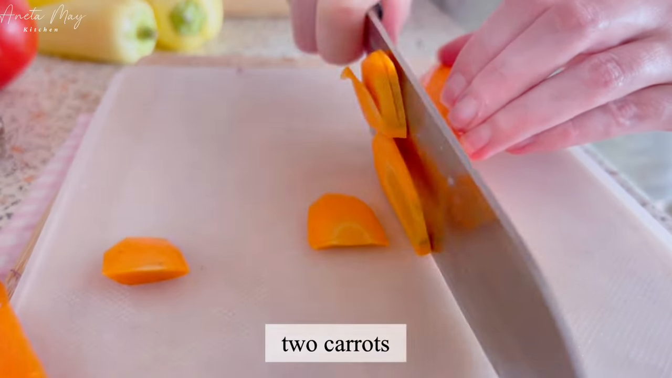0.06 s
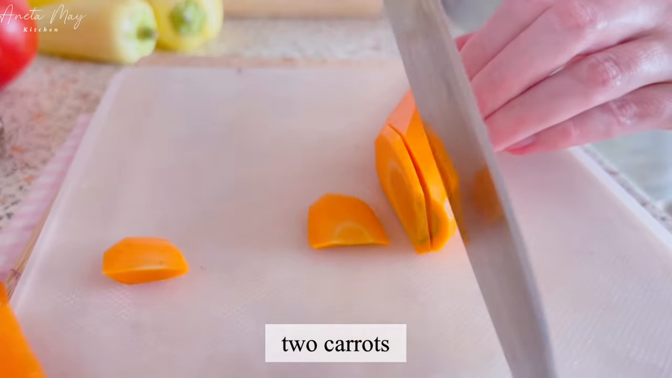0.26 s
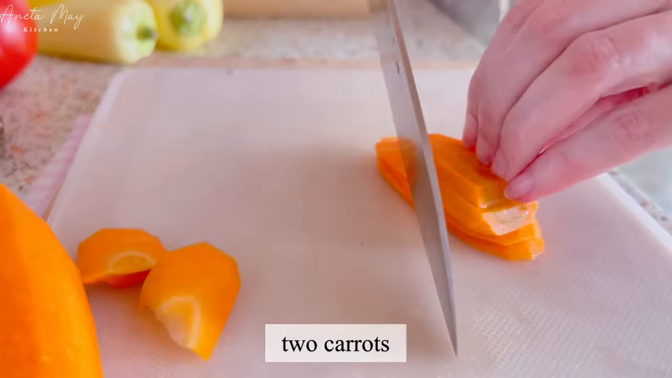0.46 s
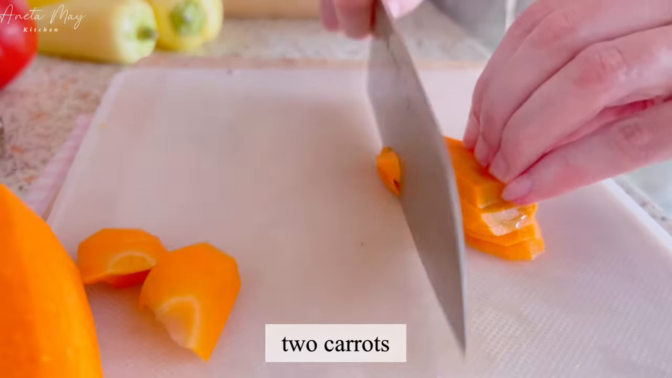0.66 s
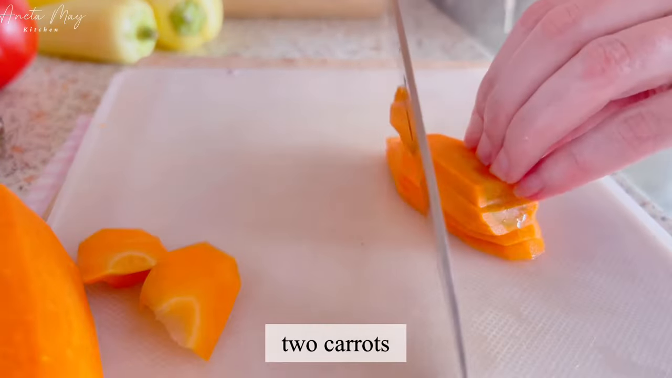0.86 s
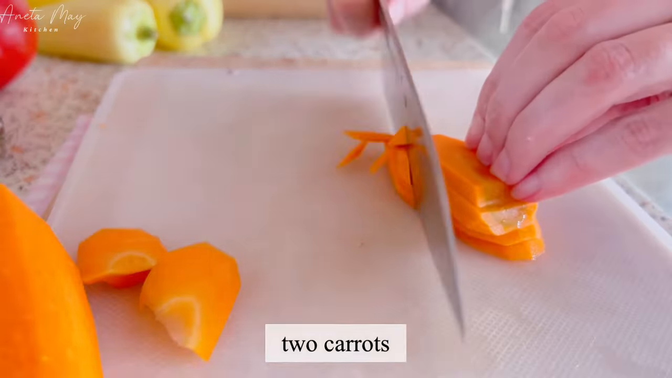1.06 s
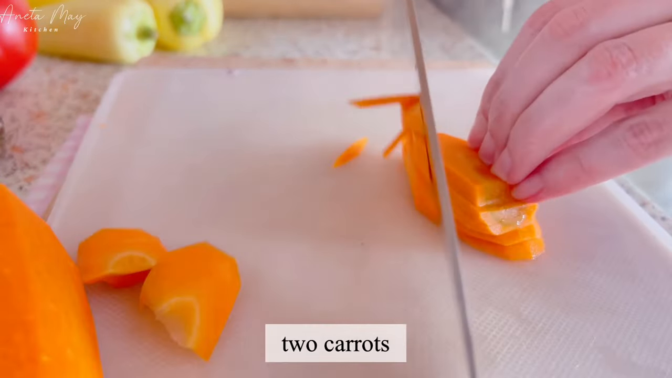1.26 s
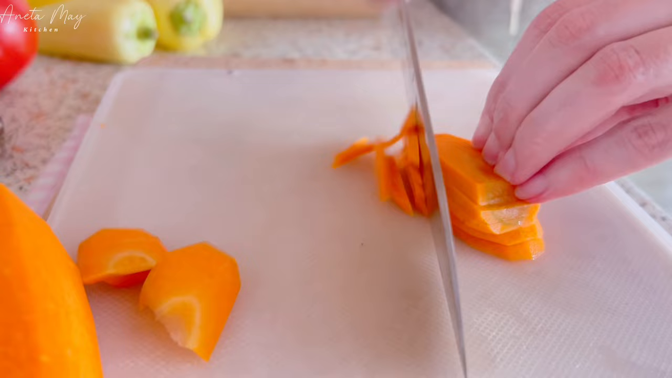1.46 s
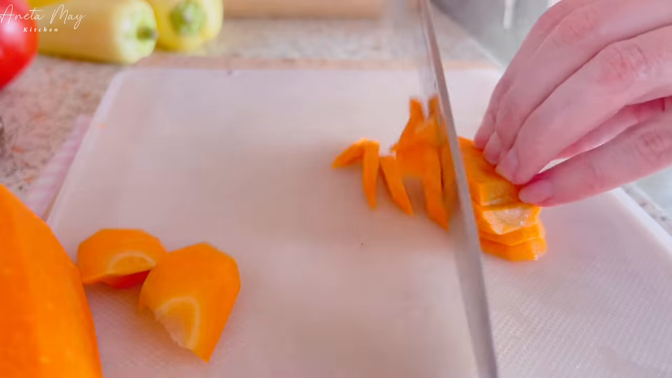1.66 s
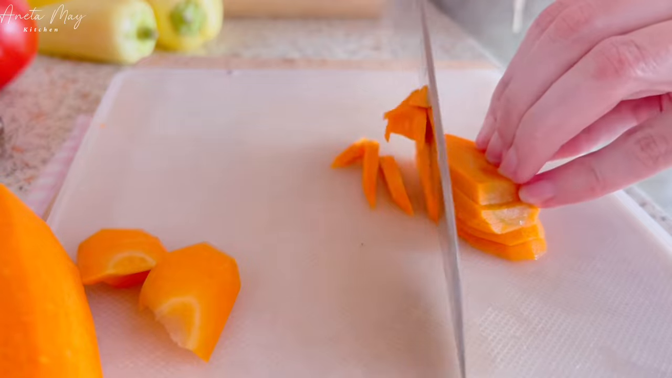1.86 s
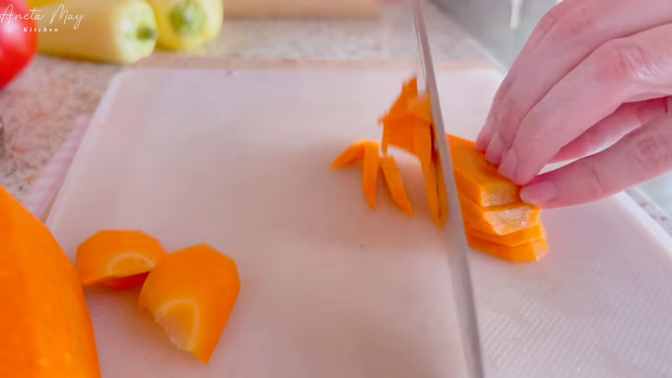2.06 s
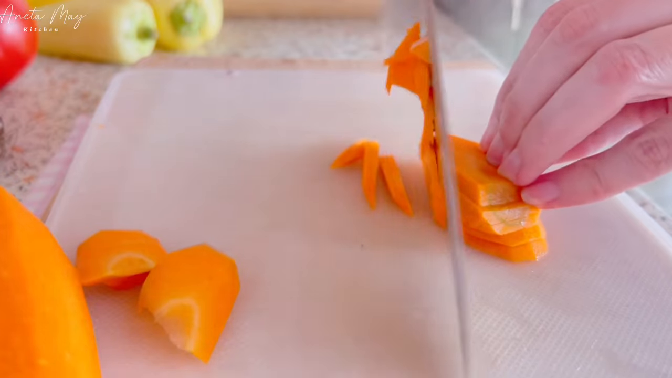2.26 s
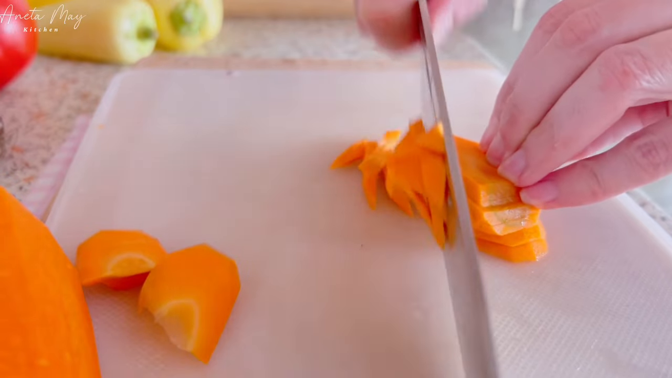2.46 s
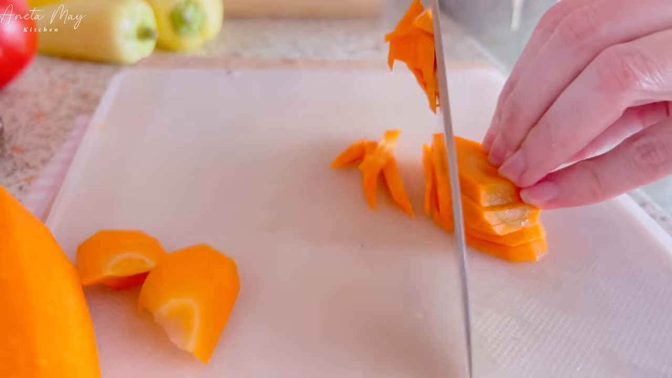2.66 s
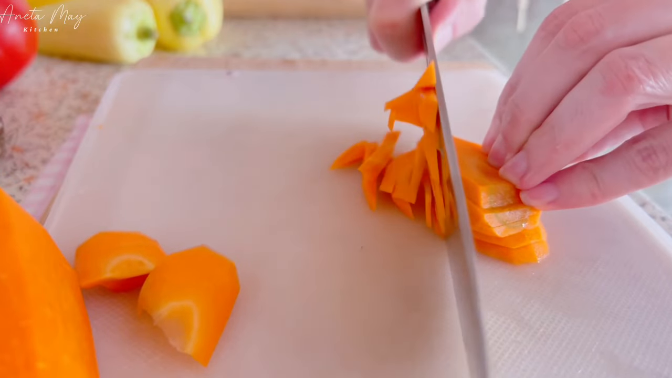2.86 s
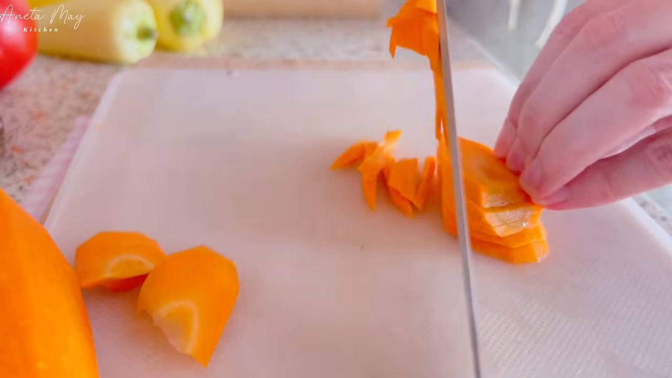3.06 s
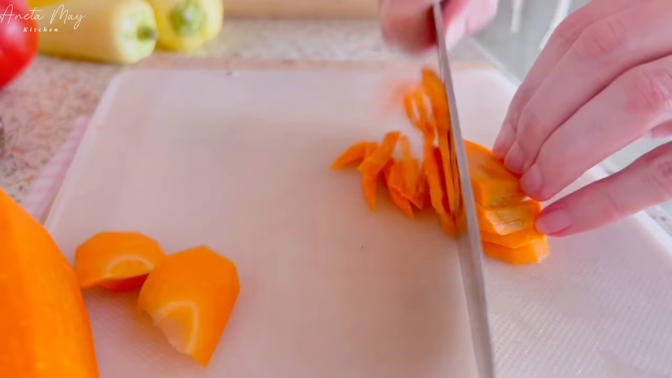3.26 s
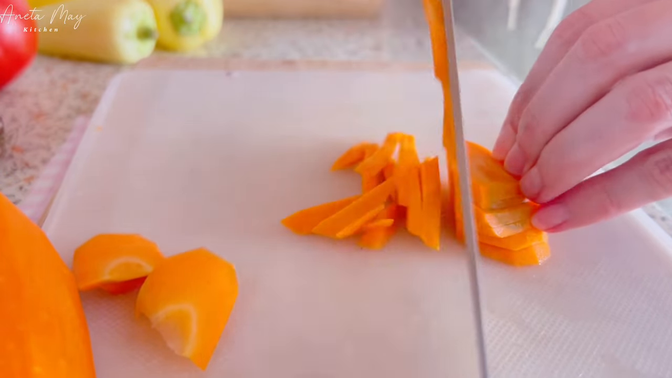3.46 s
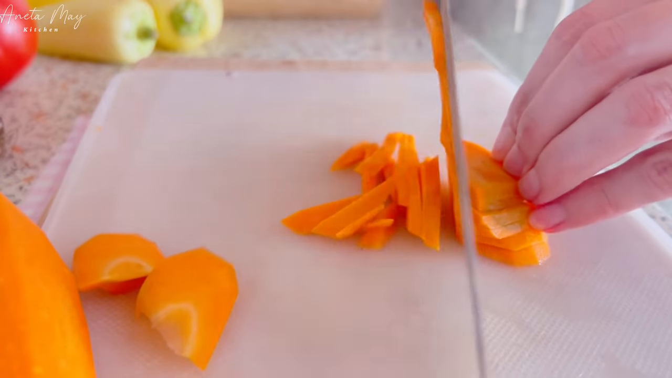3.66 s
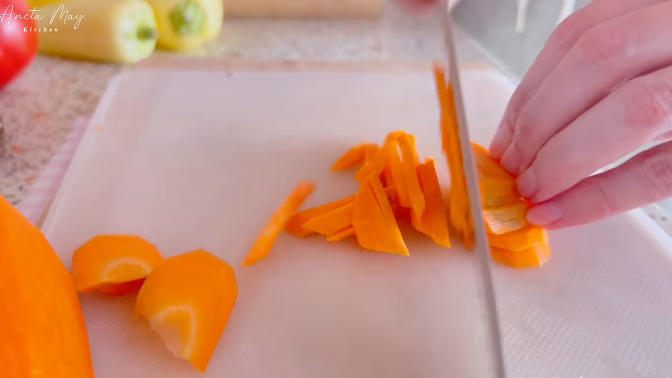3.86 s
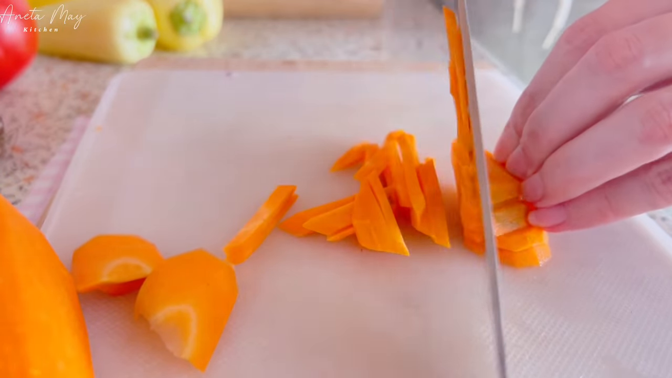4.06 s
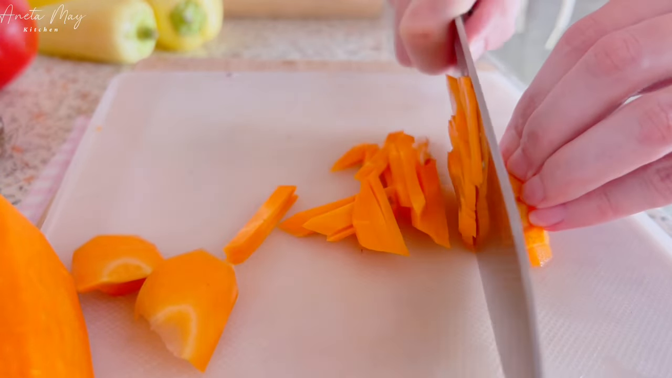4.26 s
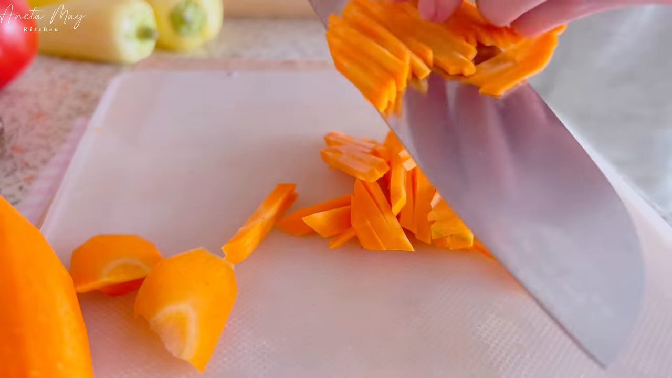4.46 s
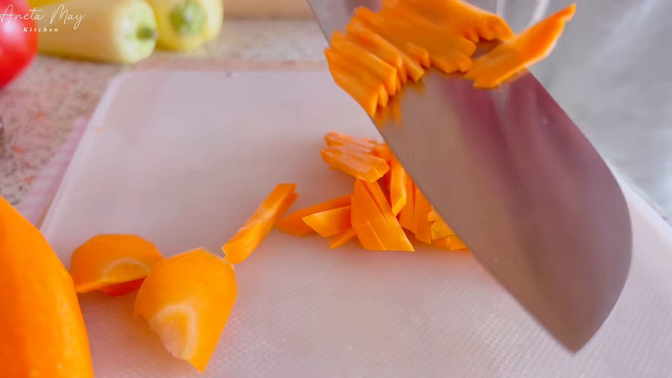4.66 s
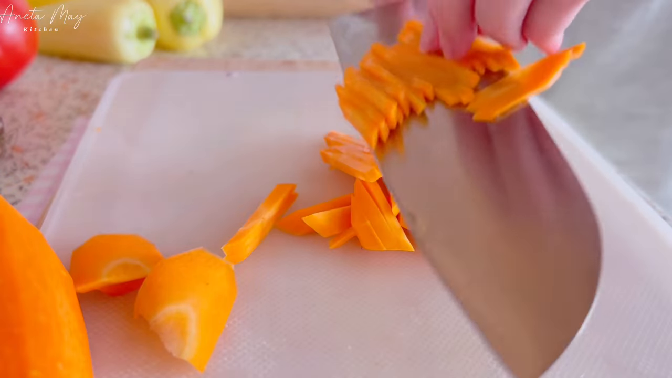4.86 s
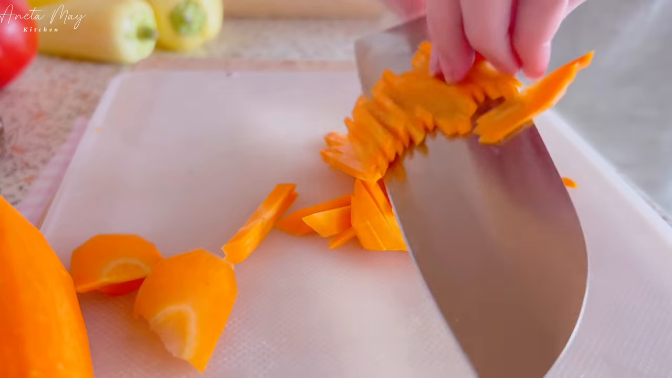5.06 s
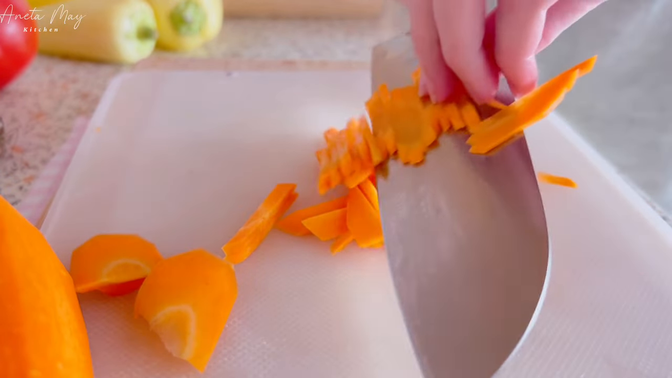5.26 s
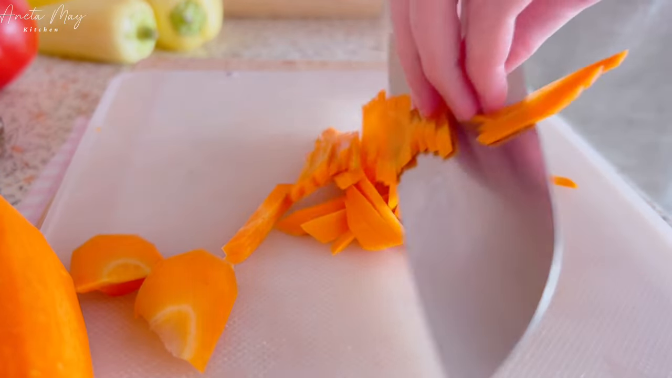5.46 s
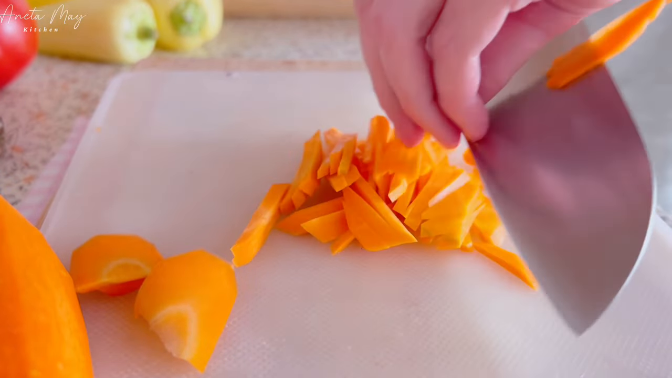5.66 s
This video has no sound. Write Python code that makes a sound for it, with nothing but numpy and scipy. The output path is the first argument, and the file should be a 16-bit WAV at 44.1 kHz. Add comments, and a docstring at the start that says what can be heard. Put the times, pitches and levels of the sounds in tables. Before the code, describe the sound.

A heavy knife slices stacked carrot on a plastic cutting board: nine crisp, juicy crunches at an even pace, with light blade scrapes between them. Early cuts are mostly tearing; later ones end in firm, low thunks that shake the counter. Small pieces tick down, then hissing finger wipes ring the blade. Close microphones, short room echo, faint low rumble and room tone.

```python
"""Quiet kitchen, a large knife on carrots over a plastic board, close to a pair of microphone ports.
A cut is under way at the start, then soft knocks and a brief wipe of the blade; more cuts follow, the fibres
tearing in a dense crackle that rings blade and board under wet hiss, with harder knocks from midway on.
Cut pieces tick now and then after the third cut, thickest after the last; then fingers wipe the blade and it
sings. Shaped noise makes room tone and counter rumble all along; decaying low sines make the booms."""
import sys
import numpy as np
from scipy import signal
from scipy.fft import rfft, irfft
from scipy.io import wavfile
from scipy.ndimage import uniform_filter1d

SR = 44100
rng = np.random.default_rng(int(sys.argv[2]) if len(sys.argv) > 2 else 0)


def unload_wav(signal):
    """Save mono or channel-first audio to the path in sys.argv[1] as 16-bit WAV at rate SR, clipped to [-1, 1]."""
    wavfile.write(
        sys.argv[1],
        SR,
        np.round(np.clip(np.atleast_2d(signal).T, -1, 1) * 32767).astype(np.int16),
    )


N = 251811


def from_db(db):
    """Amplitude gain for a level in dB."""
    return 10 ** (np.asarray(db) / 20)


def rms_one(x):
    """Scales to an rms of 1."""
    return x / np.sqrt(np.mean(x ** 2) + 1e-20)


def peak_one(x):
    """Scales both parts so that the shared part peaks at 1."""
    return x / np.abs(x[0]).max()


def in_time(rows):
    """Columns of dB joined in time, as gains; silent outside the rows."""
    s, *columns = np.transpose(rows)
    t = np.arange(N) / SR
    return [from_db(np.interp(t, s, column, left=-200, right=-200)) for column in columns]


def at_hz(points, hz):
    """Reads a curve between its points along log frequency, holding its end values."""
    curve = np.array(points)
    return np.interp(np.log(hz), np.log(curve[:, 0]), curve[:, 1])


def drift(per_s):
    """Slow chance: straight lines between random knots of spread 1."""
    knots = rng.standard_normal(int(60 * N / SR))
    return np.interp(np.arange(N) / SR * per_s, np.arange(len(knots)), knots)


def resonate(x, hz, width_hz):
    """One resonance, gain about 1 on top."""
    r = np.exp(-np.pi * width_hz / SR)
    poles = [1, -2 * r * np.cos(2 * np.pi * hz / SR), r * r]
    return signal.lfilter([(1 - r * r) / 2, 0, (r * r - 1) / 2], poles, x + 1e-18)


def body(x, modes, wander_db=None, per_s=10.):
    """Resonances side by side, each drive wandering as the contact moves; about keeps white noise's rms."""
    power = sum(from_db(2 * db) * np.pi * width / SR for hz, width, db in modes)
    out = 0
    for k, (hz, width, db) in enumerate(modes):
        wander = wander_db * drift(per_s) if wander_db else 0
        drive = x * from_db(db + wander)
        out = out + (-1) ** k * resonate(drive, hz, width)
    return out / np.sqrt(power)


def colour(x, spectrum):
    """Shapes a spectrum, falling away below its first point; white noise keeps its rms."""
    hz = np.fft.rfftfreq(N, 1 / SR) + 1
    gain = from_db(at_hz([(spectrum[0][0] / 2, -80)] + list(spectrum), hz))
    return irfft(rfft(x) * rms_one(gain), N)


def crackle(per_s, spread_db):
    """Random breaks of uneven force, drawn separately for the shared and the differing part of the ports."""
    uneven_db = spread_db * np.minimum(rng.exponential(1, (2, N)), 4)
    sizes = from_db(uneven_db) * rng.standard_normal((2, N))
    return rms_one(sizes * (rng.random(N) < per_s / SR))


def burst(ms, rise):
    """A short noisy contact that swells and dies; its envelope peaks at 1."""
    t = np.arange(int(7 * ms * SR / 1000) + 8) / (ms * SR / 1000)
    shape = t ** (2 * rise) * np.exp(-t * (1 + rise))
    return shape / shape.max() * rng.standard_normal((2, len(t)))


def add(track, s, sound):
    """Lays a sound into the track at s seconds."""
    at = round(s * SR)
    track[:, at:at + sound.shape[1]] += sound[:, :N - at]


def gesture(start, times, shape_db, level_db, fall_db_per_s):
    """Gain that climbs out of silence through the given points, then falls at a steady rate."""
    t = np.arange(N) / SR - start
    times = np.cumsum(np.maximum(times, .002))
    db = np.interp(t, [0, *times], [-35, *shape_db], left=-200)
    fall_db = fall_db_per_s * np.maximum(t - times[-1], 0)
    return from_db(np.maximum(level_db + db - fall_db, -200))


def tail(x, t60):
    """The echo alone: a dull decaying noise of equal energy, after a 4 ms delay."""
    t = np.arange(int(.4 * SR)) / SR
    echo = rng.standard_normal((2, len(t))) * from_db(-60 * t / t60) * (t > .004)
    echo = signal.lfilter([1], [1, -.6], echo)     # dulls the treble
    return signal.fftconvolve(x, echo / np.sqrt(np.sum(echo[0] ** 2)), axes=1)[:, :N]


# spectrum of the quiet kitchen: f/Hz, density level/dB
ROOM_TONE = [(59, -29.5), (100, -4), (648, -16), (1130, -16), (1760, -23.5), (6840, -36.5), (9410, -37),
             (11400, -39.5), (13500, -53), (15000, -38), (16000, -42)]
ROOM_TONE_DB = -73


def room_tone():
    """Steady noise of the kitchen, shaped by its spectrum."""
    return from_db(ROOM_TONE_DB) * colour(rng.standard_normal((2, N)), ROOM_TONE)


# the counter shakes under hands and knife: t/s, counter level/dB, level of a random low board noise/dB
RUMBLE = [(0.0, -55.5, -66), (0.32, -62.5, -86), (0.62, -60.5, -63), (0.98, -58.5, -65), (2.1, -59, -62),
          (2.37, -56, -61), (2.7, -60, -68), (2.89, -54.5, -91), (3.1, -56.5, -55), (3.24, -61.5, -62),
          (3.44, -55.5, -71.5), (3.88, -62, -68.5), (4.25, -59, -63.5), (4.82, -64, -71),
          (5.58, -58, -75.5), (5.71, -61, -57.5)]
# spectrum of the shaking: f/Hz, density level/dB
SHAKE = [(12, -43.5), (20, -1.5), (75, 6.5), (130, -3), (156, -2.5), (200, -14), (260, -38), (440, -120)]
# the counter takes a soft blow and booms: t/s, level before the soft onset/dB, f/Hz, t60/s
THUMPS = [(0.617, -37.5, 70.5, 0.15), (1.079, -31, 77.3, 0.18), (1.507, -37, 83, 0.098),
          (1.845, -61, 69, 0.14), (2.28, -53, 93.5, 0.17), (2.748, -37, 73.4, 0.099),
          (3.219, -34.5, 94.6, 0.12), (3.693, -36.5, 104, 0.21), (4.198, -32, 102, 0.12)]
COUNTER_JOLT_DB, COUNTER_LAG_S, COUNTER_SMEAR_S = -9.5, 0.02, .06     # the push also shakes the counter


def counter():
    """Lumpy low shaking, late and smeared after the knife's push, and a damped boom after each soft blow."""
    lumps = from_db(2 * drift(9))
    smeared = uniform_filter1d(force(2), int(COUNTER_SMEAR_S * SR))
    jolt = smeared[np.maximum(np.arange(N) - int(COUNTER_LAG_S * SR), 0)]
    level = in_time(RUMBLE)[0] + from_db(COUNTER_JOLT_DB) * jolt
    # the out-of-order last point makes a flat floor above 400 Hz
    shaking = colour(rng.standard_normal((2, N)), list(SHAKE) + [(400, -63.5)])
    out = level * lumps * shaking
    t = np.arange(int(.3 * SR)) / SR
    for s, level_db, hz, t60 in THUMPS:
        decay = from_db(level_db - 60 * t / t60)
        onset = 1 - np.exp(-t / 0.0065)
        boom = decay * onset * np.sin(2 * np.pi * hz * t)
        add(out, s, boom * [[1], [.3]])     # mostly shared by the ports
    return out


# fingers and slices wiping the blade: t/s, rise/s, rub level/dB, fading/(dB/s), singing over rub level/dB
WIPES = [(0.165, .008, -66.5, 300, -15), (0.24, .018, -66.5, 1493, -7.5), (4.965, 0.022, -80.5, 100, -1.5),
         (5.02, 0.0373, -66, 400, -1.5), (5.1, 0.021, -66, 148, -4.5), (5.22, 0.025, -76.5, 256.5, -1),
         (5.438, .02, -68.5, 340, -11), (5.591, .045, -58.5, 401, 3)]
# spectrum of the rub: f/Hz, density level/dB
RUB = [(1500, 0), (3000, -5.5), (4800, -7), (7000, -2.5), (9500, -5.5), (12000, -14), (15200, -3)]
# free blade singing under the fingers: f/Hz, width/Hz, level/dB
SINGING = [(2895, 50, -4.5), (3540, 72, -9), (4700, 105, -8), (5680, 70, 4), (5950, 70, -2),
           (6800, 160, -8.5), (8160, 90, -10), (8660, 56, -11), (10000, 60, -10), (11800, 49, -24),
           (12400, 70, -8), (14900, 250, -3)]


def fingers():
    """Wet skin and slices rub the steel: hiss, with the blade's narrow modes singing through."""
    rub = sum(gesture(s, [rise], [0], db, fading) for s, rise, db, fading, _ in WIPES)
    singing = sum(gesture(s, [rise], [0], db + over_db, fading) for s, rise, db, fading, over_db in WIPES)
    skin = from_db(3.5 * drift(40)) * crackle(3600, spread_db=-2)
    blade = body(singing * skin, SINGING, wander_db=4.0, per_s=18)
    return blade + from_db(-1.0) * colour(rub * skin, RUB)


# cut pieces snap off or land: t/s, peak level/dB, centre f/Hz, top level before a trim/dB,
# length scale/ms, swell (0 sudden to 3 slow)
TICKS = [(1.214, -57.5, 3280, -52.5, 5.5, 0.65), (1.659, -55, 3050, -44, 4.9, 0.45),
         (2.688, -41.5, 1820, -45.5, 1.9, 0.37), (2.95, -63, 3000, -56.5, 4.1, 0.95),
         (2.971, -47.5, 1835, -63, 3.4, .3), (3.133, -43.5, 2080, -72, 0.83, 0.62),
         (3.307, -25.5, 3596, -50.5, 5, 2.9), (3.397, -66, 2130, -52.5, 4.3, 0.78),
         (3.804, -50.5, 2950, -58.5, 10, 0.54), (3.865, -36.5, 2210, -61.5, 4.3, 0.81),
         (3.896, -62, 2530, -62, 3.6, 0.83), (4.489, -44, 2560, -45.5, 2.6, 0.32),
         (4.542, -24.5, 2510, -82, 2, 0.071), (4.583, -42, 2190, -86.5, 0.9, 0.38),
         (4.635, -43.5, 1630, -45.5, 2.2, 0.28), (4.685, -39, 2150, -63, 1.2, 0.32),
         (4.709, -49.5, 1530, -85, 2.8, 0.63), (4.743, -37.5, 2030, -56, 2.2, 0.51),
         (4.812, -56.5, 1636, -91.5, 2.23, 0.5), (5.358, -80, 4530, -48.5, 0.95, 0.19),
         (5.55, -54, 1560, -90, 4.2, 1.2)]
# wet top, also heard in the cuts: f/Hz, density level/dB
HISS = [(4000, -17.5), (5000, -7.5), (6200, -3), (7900, 0), (9500, -0.5), (12000, -3), (15500, 1.5)]


def pieces():
    """Each piece is a tiny burst through broad resonances set by its size; it taps the board and rattles out."""
    out, top = np.zeros((2, N)), np.zeros((2, N))
    for s, peak_db, hz, top_db, ms, rise in TICKS:
        hit = np.pad(burst(ms, rise), ((0, 0), (0, 900)))     # room to ring
        ring = resonate(hit, hz, hz * 0.22)
        ring += 0.54 * resonate(hit, hz * 1.12, hz * .5)
        ring += 0.62 * resonate(hit, hz * 0.42, hz * 0.57)
        tick = resonate(ring, hz * 0.73, hz * 0.54)
        add(out, s, from_db(peak_db) * peak_one(tick))
        add(top, s, from_db(top_db - 10.5) * hit)
    rattle = from_db(-17.5) * tail(out, 0.058) + from_db(-21) * tail(out, 0.28)
    return out + colour(top, HISS) + rattle


# the edge bites, force swells, holds, lets go:
# bite t/s, swell/s (from the bite), hold/s, tearing level/dB, wet hiss level/dB, push into the board level/dB
CUTS = [(-0.1, 0.082, 0.032, -48, -48, -47.5), (0.472, 0.076, 0.027, -38, -41, -48.5),
        (0.939, 0.095, 0.023, -38.5, -42, -45), (1.356, 0.1, 0.04, -38.5, -43, -48),
        (1.784, 0.089, 0.047, -39, -43.5, -45), (2.209, 0.083, 0.067, -43, -48, -46),
        (2.705, 0.046, 0.04, -37, -42, -40.5), (3.157, 0.057, 0.041, -36.5, -41, -35.5),
        (3.652, .04, 0.028, -36, -38, -30), (4.115, 0.044, 0.078, -40.5, -44.5, -36.5)]
BITE_S = 0.021
# for tearing, hiss and push: swell after the bite (dB/s), change over the hold (dB), fall after it (dB/s)
SWELL_DB_PER_S, HOLD_DB, LET_GO_DB_PER_S = [203, 198.5, 260.5], [-1, 2.5, -7.5], [431, 522.5, 402]
# the blade drags free of the slices and fades; at 3.295 s a short snap instead:
# t/s, length/s, tearing level/dB, wet hiss level/dB, push level/dB
LIFTS = [(0.033, 0.1, -69, -67, -58.5), (0.292, 0.1, -53.5, -61, -37), (0.662, .085, -56, -64, -67),
         (1.118, 0.08, -55, -60.5, -56.5), (1.56, 0.11, -62, -67.5, -60.5), (1.975, 0.069, -57, -66, -64),
         (2.359, 0.1, -59.5, -61.5, -64), (2.569, 0.14, -69.5, -75.5, -55), (2.842, .12, -64, -69.5, -60),
         (3.295, 0.017, -39, -50.5, -46), (3.33, 0.086, -75, -75.5, -62.5), (3.777, .06, -58.5, -62, -56.5),
         (3.857, 0.11, -59.5, -69.5, -53), (4.305, 0.074, -69, -69, -66)]
LIFT_RISE_S, LIFT_FADE_DB, LIFT_END_DB_PER_S = .018, -9.5, 803
# the edge is set on the carrot and presses in:
# t/s, length/s, tearing level/dB, wet hiss level/dB, push level/dB
SETS = [(0.167, 0.087, -49, -48.5, -43.5), (0.344, 0.027, -56.5, -50, -68),
        (2.13, 0.054, -73.5, -82, -51.5), (2.499, 0.042, -55, -58.5, -51.5), (2.64, 0.055, -51.5, -56, -58),
        (2.987, 0.049, -67, -65, -78), (3.087, .045, -51, -56.5, -60), (3.432, 0.032, -69, -70.5, -73.5),
        (3.562, 0.04, -49.5, -55.5, -55), (4.027, 0.049, -55, -59.5, -54.5)]
SET_RISE_S, SET_START_DB, SET_END_DB_PER_S = .014, -10.5, 799.5


def force(layer):
    """Gain of tearing (0), hiss (1) or push (2) over all cuts, lifts (with the one snap) and sets."""
    total = np.zeros(N)
    for s, swell, hold, *db in CUTS:
        times = [BITE_S, swell - BITE_S, hold]
        bite_db = -SWELL_DB_PER_S[layer] * (swell - BITE_S)
        total += gesture(s, times, [bite_db, 0, HOLD_DB[layer]], db[layer], LET_GO_DB_PER_S[layer])
    for s, length, *db in LIFTS:
        times = [LIFT_RISE_S, length - LIFT_RISE_S]
        total += gesture(s, times, [0, LIFT_FADE_DB], db[layer], LIFT_END_DB_PER_S)
    for s, length, *db in SETS:
        times = [SET_RISE_S, length - SET_RISE_S]
        total += gesture(s, times, [SET_START_DB, 0], db[layer], SET_END_DB_PER_S)
    return total


# edge meets board: t/s, knock level/dB, blade bending and crack levels before a trim/dB,
# contact scale/ms (stretched per layer)
KNOCKS = [(0.149, -25, -34, -55, 4.3), (0.317, -28.5, -35, -60, 1.8), (0.348, -30, -59, -54.5, 3.4),
          (0.365, -39.5, -77, -52.5, 2.1), (2.157, -50, -82, -76, 1.2), (2.285, -29, -41, -53.5, 1.98),
          (2.515, -38.5, -47, -59, 2.34), (2.744, -24, -30.5, -34, 2.5), (3.216, -29.5, -41, -32, 3.4),
          (3.697, -18.5, -38.5, -24.5, 2.95), (3.747, -35.5, -55.5, -42.5, 2.6),
          (3.894, -36, -49, -68, 2.5), (4.133, -39, -36.5, -59, 3), (4.196, -18.5, -27.5, -34.5, 3),
          (4.398, -37, -42.5, -65, 4), (5.552, -54, -69, -90, 3.0)]
# board on the counter: f/Hz, width/Hz, level/dB
BOARD = [(83, 25, -18), (202.3, 59, -3), (242.7, 61.5, 0), (347.2, 66, 0), (401.2, 60, -3.5),
         (486.5, 49, -8)]
# blade: f/Hz, width/Hz, level/dB
BLADE = [(587, 140, -7.5), (906, 57, 2.5), (1258, 160, -10), (1407, 120, -9.5), (1910, 308, -5),
         (2216, 170, -0.5), (2440, 447, -5), (2985, 283, -6.5), (3135, 120, -4.5), (3726, 1000, -10.5),
         (4180, 160, -5.5), (4780, 520, -17)]


def knife():
    """Tearing and knocks drive the same blade and board; juice hisses above them."""
    tear, hiss, push = (force(layer) for layer in range(3))
    jerks = from_db(3.0 * drift(50))     # the edge sticks and breaks through
    on_blade = tear * jerks * crackle(5000, spread_db=-0.5)
    low_noise = in_time(RUMBLE)[1] * from_db(3 * drift(14))
    on_board = (push * from_db(2.0) + low_noise) * crackle(2500, spread_db=6.5)
    bending, thuds = np.zeros((2, 2, N))
    for s, knock_db, bend_db, crack_db, ms in KNOCKS:
        # each layer starts slightly ahead of the table's time
        contact = burst(max(ms * 0.75, 1), rise=1.0)
        thud = body(np.pad(contact, ((0, 0), (0, 4000))), BOARD)
        add(thuds, s - .0045, from_db(knock_db) * peak_one(thud))
        add(bending, s - .0025, from_db(bend_db + 12.5) * burst(ms, rise=0.6))
        add(on_blade, s - .0015, from_db(crack_db + 4.0) * burst(ms * 1.5, rise=0.72))
    soft = signal.butter(2, 800, fs=SR, output="sos")     # the plastic yields and passes no click
    board = signal.sosfilt(soft, thuds + body(on_board, BOARD, wander_db=2.0, per_s=6.5))
    bend = resonate(resonate(bending, 900, 300), 880, 500)     # the blade's lowest bending, strong in a knock
    juice = colour(hiss * jerks ** 1.3 * crackle(15000, spread_db=-3.0), HISS)
    blade = body(on_blade, BLADE, wander_db=2.5, per_s=29)
    return blade + board + bend + juice


# how alike the two ports are, used up to 6900 Hz: f/Hz, left-right likeness
LIKENESS = [(60, 0.96), (300, 0.93), (700, 0.82), (1300, 0.43), (2700, 0.73), (4800, 0.88), (6200, 0.18)]
# balance of the ports: f/Hz, left over right level/dB
LEFT_DB = [(60, 0.5), (300, 1), (950, 2.5), (2400, 3.5), (4400, 3), (6200, 3.5), (6900, 0), (16000, 0)]
# phase of the ports: f/Hz, lead of the left port/rad
LEFT_LEADS = [(20, 0.15), (300, .15), (950, 0.74), (1500, -0.58), (2400, 0.41), (4200, 0.93), (5600, 0.48),
              (7000, 0)]
# above this frequency the ports turn against each other, half a cycle for every step
TURN_FROM_HZ, TURN_STEP_HZ = 7560, 1965


def ports(shared, differing):
    """Left and right from a shared and a differing part, with their level and phase offsets by frequency."""
    hz = np.fft.rfftfreq(N, 1 / SR) + 1
    turn = np.pi * np.maximum(hz - TURN_FROM_HZ, 0) / TURN_STEP_HZ
    alike = np.where(hz > 6900, 1 - .25 * np.sin(turn) ** 2, at_hz(LIKENESS, hz))
    a = np.sqrt((1 + alike) / 2) * rfft(shared)
    b = np.sqrt((1 - alike) / 2) * rfft(differing)
    turn -= .25 * np.sin(2 * turn)     # lingers where the ports are in step or opposite
    # half the offset goes to each port
    tilt = from_db(at_hz(LEFT_DB, hz) / 2) * np.exp(.5j * (at_hz(LEFT_LEADS, hz) - turn))
    return irfft(np.array([(a + b) * tilt, (a - b) / tilt]), N)


KITCHEN_T60_S, KITCHEN_DB = 0.15, -22.5


def scene():
    """Knife, pieces and fingers with the kitchen's echo, over counter and room tone, at the two ports."""
    work = knife() + pieces() + fingers()
    echo = from_db(KITCHEN_DB) * tail(work, KITCHEN_T60_S)
    shared, differing = work + echo + counter() + room_tone()
    return ports(shared, differing)


CUTOFF_HZ = 15750


def record(dry):
    """The top is cut steeply."""
    steep = signal.ellip(12, .5, 60, CUTOFF_HZ, fs=SR, output="sos")
    return signal.sosfilt(steep, dry)


dry = scene()
out = record(dry)
unload_wav(out)
```